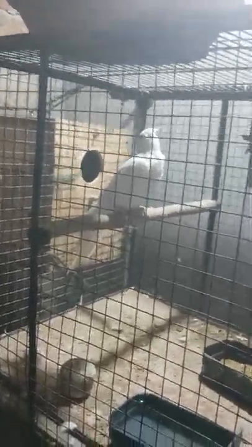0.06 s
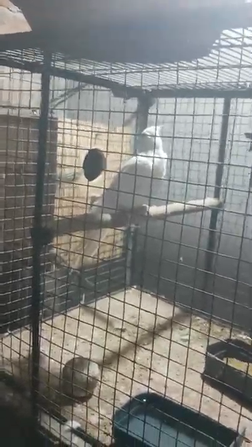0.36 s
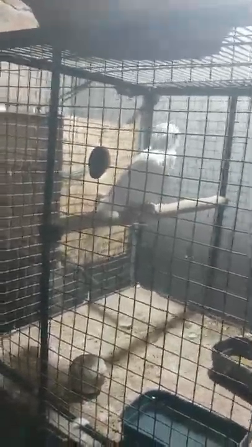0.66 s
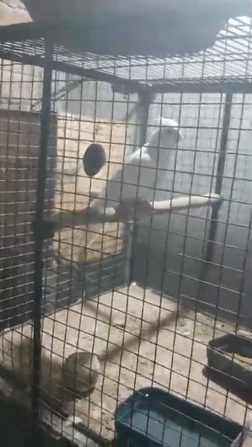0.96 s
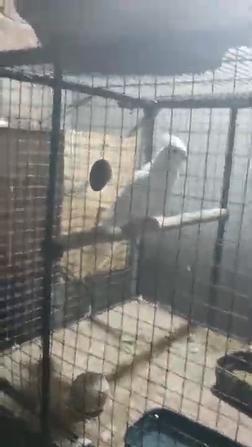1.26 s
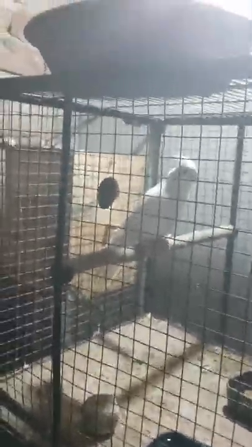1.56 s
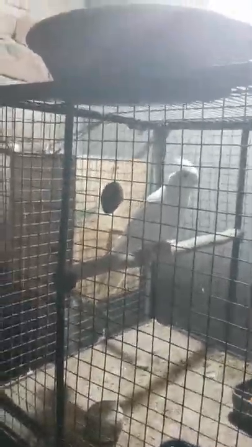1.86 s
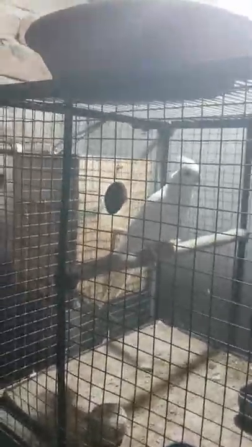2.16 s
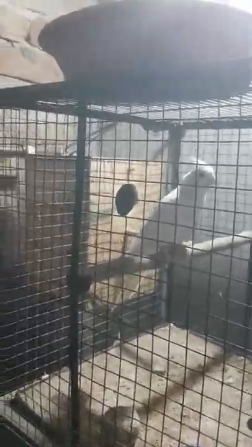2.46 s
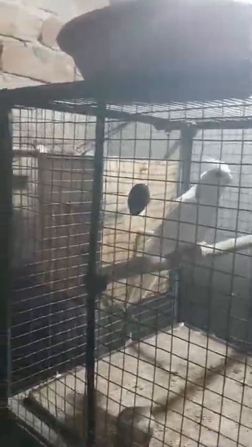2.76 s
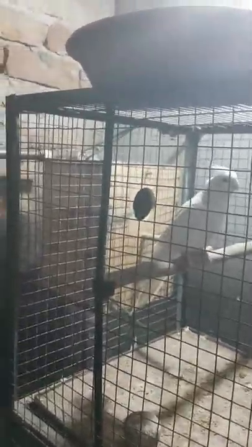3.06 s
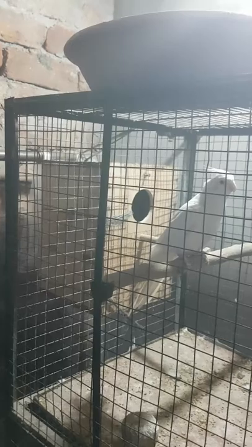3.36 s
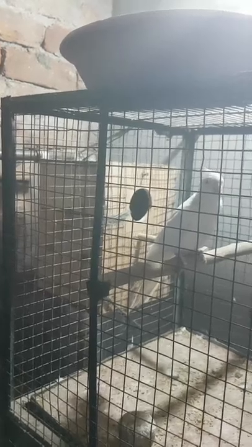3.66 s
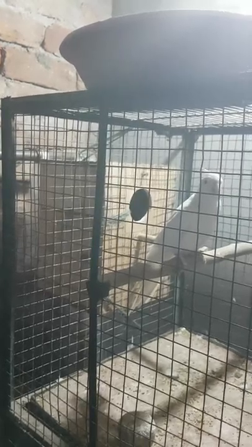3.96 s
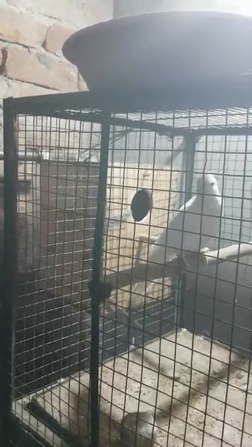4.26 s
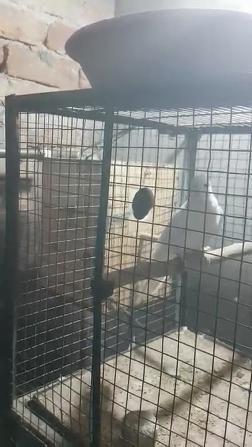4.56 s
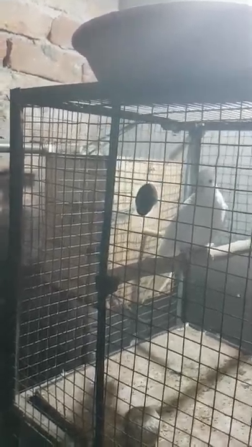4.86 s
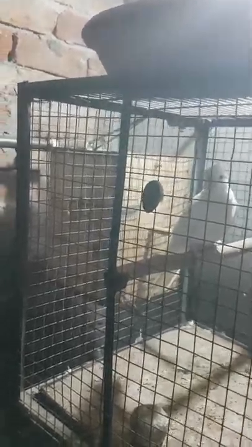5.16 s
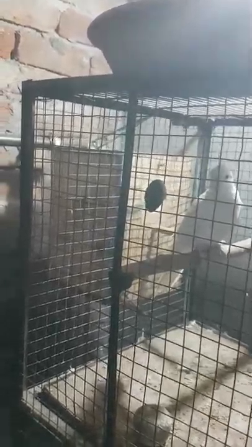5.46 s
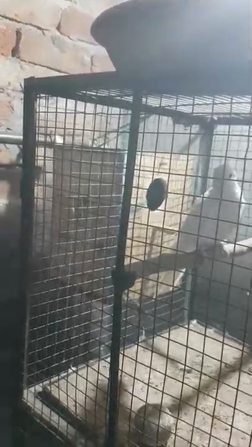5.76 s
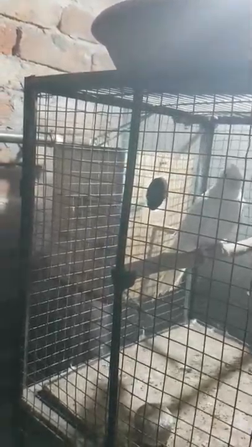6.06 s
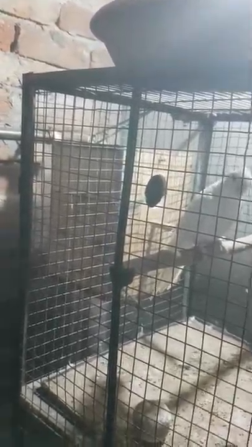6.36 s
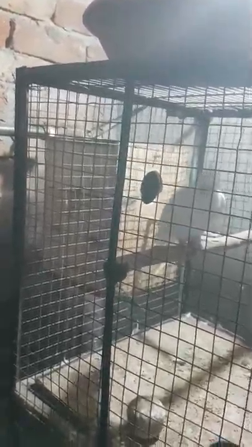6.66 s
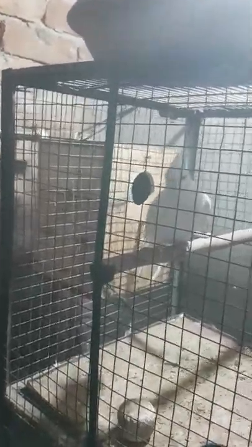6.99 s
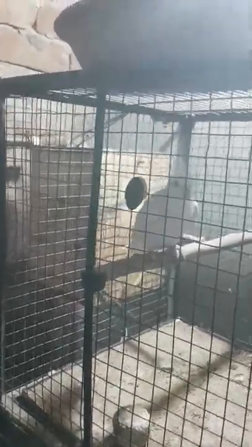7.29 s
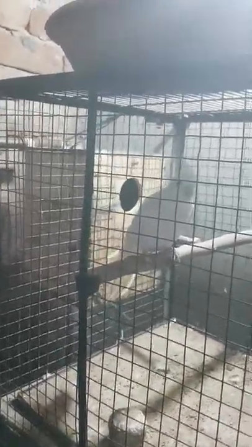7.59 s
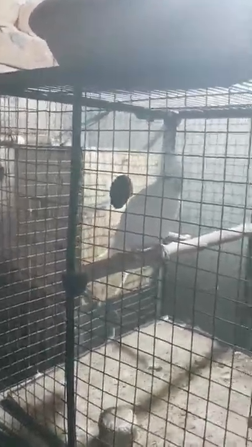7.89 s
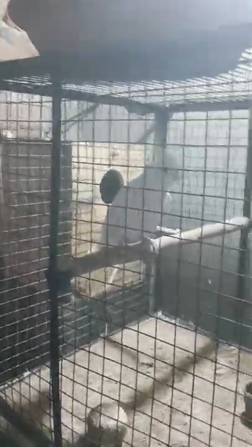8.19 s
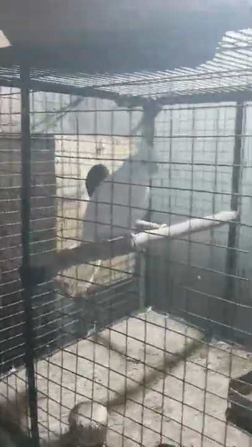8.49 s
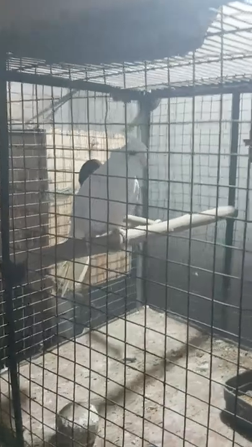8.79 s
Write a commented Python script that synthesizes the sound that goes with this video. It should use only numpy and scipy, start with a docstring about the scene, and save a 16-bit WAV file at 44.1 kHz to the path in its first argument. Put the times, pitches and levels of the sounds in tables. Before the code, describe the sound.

Over a faint room hum, a nearby cockatiel, a little to the right, gives a loud double-peaked whistle, then chatters quietly with short chirps and beak clicks. It whistles loudly again, rasps and screeches once. Faint notes and feather flicks lead to a sharp rising chirp, a quick run of warbles and a soft, dull bump. Close walls add a tight, short echo to the calls.

```python
"""A short rasp over faint hum and room noise: a cockatiel in a wire cage in a small brick room. Its syrinx
sings soft warbles, two loud two-humped whistles and one sharp chirp, and flaps chaotically for harsh rasps and
a screech. In between, the beak clicks and feathers brush. Close walls ring after every sound, and the loud
whistles flutter; near the end something bumps dully."""
import sys
import numpy as np
from scipy import signal
from scipy.fft import rfft, irfft
from scipy.io import wavfile
from scipy.ndimage import uniform_filter1d

SR = 44100
rng = np.random.default_rng(int(sys.argv[2]) if len(sys.argv) > 2 else 0)


def put_to_file(sound):
    """Save the sound as 16-bit audio at rate SR, in the file named by the first command-line argument."""
    columns = np.atleast_2d(sound).T  # one column per channel
    safe = np.clip(columns, -1, 1)
    whole_steps = np.round(safe * 32767)
    wavfile.write(sys.argv[1], SR, whole_steps.astype(np.int16))


N = 398223
FREQS = np.fft.rfftfreq(N, 1 / SR)
PROGRESS = np.linspace(0, 1, 41)  # breakpoints through one gesture


def gain_of(db):
    """Decibels to amplitude."""
    return 10 ** (np.asarray(db) / 20)


def unit_rms(x):
    """Scales to rms 1."""
    return x / np.sqrt(np.mean(x ** 2) + 1e-20)


def curve_at(points, hz):
    """Reads a curve on a log-frequency axis."""
    point_hz, value = np.transpose(points)
    return np.interp(np.log(hz + 1), np.log(point_hz + 1), value)


def add(mix, start_s, sound):
    """Mixes a sound in at its cue."""
    part = mix[max(round(start_s * SR), 0):][:len(sound)]
    part += sound[:len(part)]


def phase_of(hz):
    """Running phase of a moving pitch."""
    return 2 * np.pi * np.cumsum(hz) / SR


def low_cut(x, hz, order):
    """Rolls off the bass."""
    return signal.sosfilt(signal.butter(order, hz, "high", fs=SR, output="sos"), x)


def noise(eq, size):
    """White noise through an EQ curve, at rms 1."""
    gains = gain_of(curve_at(eq, np.fft.rfftfreq(size, 1 / SR)))
    return unit_rms(irfft(rfft(rng.standard_normal(size)) * gains, size))


def noise_band(centre_hz, width_hz, size):
    """Noise in a steep resonance that can glide: shift down to zero, smooth three times, shift back."""
    carrier = np.exp(1j * phase_of(np.full(size, centre_hz)))
    pole = np.exp(-np.pi * width_hz / SR)
    smoothed = signal.lfilter([1], np.poly([pole] * 3), rng.standard_normal(size) / carrier)
    return unit_rms((carrier * smoothed).real)


def wobble(top_hz, size):
    """Random motion of rms 1, slower than top_hz."""
    lowpass = signal.butter(2, top_hz, fs=SR, output="sos")
    return unit_rms(signal.sosfilt(lowpass, rng.standard_normal(size + SR // 10))[-size:])


def automation(times_s, *lanes):
    """Turns breakpoints into a soft-edged gate and one curve per lane."""
    t = np.arange(times_s[0], times_s[-1], 1 / SR)
    gate = np.clip(np.minimum(t - t[0], t[-1] - t) / 0.0017, 0, 1)
    return gate, *(np.interp(t, times_s, np.full(len(times_s), lane)) for lane in lanes)


def panned(pair, pan):
    """Tilts a stereo pair left or right, band by band, at constant power."""
    ratio = gain_of(curve_at(pan, FREQS))
    gains = np.array([ratio, np.ones_like(ratio)]) / np.sqrt((1 + ratio ** 2) / 2)
    return irfft(rfft(pair) * gains, N)


# EQ of the room's rumble and hiss: freq_hz, gain_db
RUMBLE_EQ = [(15, -58), (25, 2), (143, -2.5), (251, -4), (303, -2), (366, -5.5), (479, -8.5), (543, -9),
             (822, -11.5), (951, -11.5), (1200, -11.5), (1970, -11), (2430, -12), (3050, -20),
             (3600, -23.5), (4680, -58), (7920, -120)]
ROOM_HISS_EQ = [(2120, -59), (3600, -4), (4380, -4), (4720, 1.5), (4950, 0.5), (5230, -59), (5670, -11.5),
                (6570, -6.5), (7430, -8), (7700, -12), (8340, -23.5), (8930, -28), (13900, -21),
                (14900, -20.5), (15600, -28)]
# Partials of the hum: pitch_hz, level_db (before the trim)
HUM_PARTIALS = [(140.0, -57.5), (215.3, -63), (301.5, -63.5), (538.3, -65.5), (769.8, -72), (909.8, -65.5),
                (958.2, -63.5), (1104, -72)]
# How alike left and right are: freq_hz, coherence (0-1)
ROOM_COHERENCE = [(60, 1), (130, 0.89), (290, 0.88), (640, 0.37), (1410, 0.021), (3100, 0.02),
                  (6820, 0.017), (15000, 0.02)]
# Where the room tone leans: freq_hz, left_minus_right_db
ROOM_PAN = [(60, 0), (110, -2), (200, -2), (380, -1.5), (700, -4), (1290, -5.5), (2380, -10), (4400, -9),
            (8120, -5.5), (15000, 4)]
def room_tone(rumble_db=-48, hiss_db=-59, whine_db=-57, hum_trim_db=-1, waver_hz=1.47):
    """The bed: low rumble, thin hiss, a narrow whine near 5 kHz and a wavering hum."""
    left, spread = (gain_of(rumble_db) * noise(RUMBLE_EQ, N) + gain_of(hiss_db) * noise(ROOM_HISS_EQ, N)
                    + gain_of(whine_db) * noise_band(5050, 700, N) for _ in range(2))
    coherence = curve_at(ROOM_COHERENCE, FREQS)
    right = irfft(np.sqrt(coherence) * rfft(left) + np.sqrt(1 - coherence) * rfft(spread), N)
    hum = sum(gain_of(db + hum_trim_db) * unit_rms(np.sin(phase_of(hz + waver_hz * wobble(5.85, N))))
              for hz, db in HUM_PARTIALS)
    return panned(np.array([left, right]) + hum, ROOM_PAN)


# EQ of the hiss in a harsh call: freq_hz, gain_db
RASP_HISS_EQ = [(710, -78), (1200, -49), (1320, -1), (2230, -20), (2480, -17), (3140, 3), (3280, 3.5),
                (3650, -15.5), (4430, -3), (4980, -2), (6040, 3), (8880, -17), (9570, -23.5), (12900, -27),
                (15500, -26)]
# Rasp cues: start_s, rise_s, fall_s, level_db, onset_db (against the peak), from_hz, to_hz,
# second_hz, second_db, hiss_db (both levels against the gliding resonance)
RASP_CUES = [ (.002, 0.033, 0.029, -35, -3, 2650, 2550, 3250, -10, -9),
             (.592, 0.066, .037, -39, -6, 1950, 2150, 1100, -0.5, -21.5),
             (.935, .012, .03, -30, -7, 2900, 3120, 1760, -8, -5.5),
             (.969, 0.023, 0.027, -34, 3, 4400, 4300, 2000, -8, -12),
             (4.343, 0.021, 0.021, -25.5, 0, 2620, 2600, 1700, -3.5, -27.5),
             (4.617, 0.0098, .016, -38, -8, 2730, 2650, 4920, -6, -15),
             (4.757, .055, 0.029, -24, -25, 2280, 2500, 3580, -4, 3),
             (5.051, .026, .033, -21, -12, 2210, 2300, 4780, 0.5, 2),
             (5.108, .006, 0.029, -38, -2, 1980, 1500, 4000, -9, -20)]
def rasp(start_s, rise_s, fall_s, level_db, onset_db, from_hz, to_hz, second_hz, second_db, hiss_db):
    """The syrinx flaps chaotically: ragged bursts in a gliding and a steady resonance, over hiss."""
    t = (rise_s + fall_s) * PROGRESS
    swell_db = np.where(t < rise_s, onset_db * (1 - t / rise_s) ** 2, -15.5 * ((t - rise_s) / fall_s) ** 2)
    glide_hz = from_hz + (to_hz - from_hz) * PROGRESS
    gate, db, hz = automation(start_s + t, level_db + swell_db, glide_hz)
    size = len(gate)
    voice = noise_band(hz, 1100, size) + gain_of(second_db) * noise_band(second_hz, 1500, size)
    voice += gain_of(hiss_db) * noise(RASP_HISS_EQ, size)
    grain = np.exp(0.28 * wobble(500, size))
    return start_s, gate * gain_of(db) * unit_rms(low_cut(voice, 1400, order=3) * grain)


# Formants of throat and beak: freq_hz, gain_db
THROAT_EQ = [(700, -38), (1100, -19.5), (1600, -7.5), (2100, 2.5), (2700, 5), (3400, -2.5), (4200, -5.5),
             (5400, -20.5), (8000, -23.5), (9800, -26), (12500, -26.5), (16000, -25.5)]
# EQ of the whistle's breathy hiss: freq_hz, gain_db
BREATHY_EQ = [(1000, -22.5), (1800, 4.5), (3000, -8.5), (4300, 16.5), (5600, -11), (8000, 2.5),
              (9800, -43.5), (12500, -7), (15500, -13.5)]
def whistle(times_s, pitch_hz, level_db, roughness, overtones_db,
            jitter=0.1, flutter_hz=265, breath_db=-27, hoarse_db=-23):
    """The syrinx sings a tone that shakes with roughness; pushed hard, it flutters and turns hoarse."""
    gate, hz, db, rough = automation(times_s, pitch_hz, level_db, roughness)
    size = len(gate)
    effort = np.clip((db + 41) / 16, 0, 1)
    hz = uniform_filter1d(hz, size=200)
    phase = phase_of(hz * (1 + rough * jitter * wobble(550, size) + 0.0139 * wobble(108, size)))
    source_db = [0] + [overtone_db - 10 * (1 - effort) for overtone_db in overtones_db]  # soft is dull
    gains = [gain_of(partial_db + curve_at(THROAT_EQ, k * hz)) * (k * hz < SR / 2)
             for k, partial_db in enumerate(source_db, 1)]
    # the overtones are hoarser than the fundamental
    smear = wobble(350, size) * np.sqrt(rough + effort / 2)
    tone = sum(gain * np.exp(1j * (k * phase + (k - 1) * smear)) for k, gain in enumerate(gains, 1))
    tone /= np.sqrt(sum(gain ** 2 for gain in gains) / 2)
    # a slow second vibration of the membranes hangs a ladder of sidebands under every partial
    flutter = np.exp(-1j * phase_of(flutter_hz * (1 + 0.194 * wobble(56.7, size))))
    depth = 0.42 * np.clip((db + 34) / 10, 0, 1)
    tone = (tone * (1 + depth * flutter + (depth * flutter) ** 2)).real / np.sqrt(1 + depth ** 2)
    falter = gain_of(2.5 * (1 - effort) * wobble(45, size))
    shimmer = 1 + 0.31 * rough * wobble(550, size)
    hoarse = gain_of(hoarse_db) * effort * 2 * rough * noise_band(2 * hz, 1200, size)
    breath = gain_of(breath_db) * (0.5 + 2 * rough) * noise(BREATHY_EQ, size)
    return times_s[0], gate * gain_of(db) * (tone * falter * shimmer + hoarse + breath)


# Soft notes: start_s, length_s, first_hz, middle_hz, last_hz, level_db, roughness (0-1)
WARBLE_CUES = [ (0.267, .012, 2600, 2780, 3050, -38.5, 0.1), (.283, .02, 3200, 3620, 3950, -50, .5),
               (.314, 0.069, 2150, 2255, 2310, -48, 0.6), (0.334, 0.024, 2820, 3330, 2950, -47, 0.2),
               (0.356, 0.042, 2920, 3150, 3560, -42, 0.54), (0.995, 0.023, 1910, 2064, 2560, -35, 0.3),
               (1.053, 0.03, 1450, 1286, 1450, -45.5, 0.54), (1.362, 0.039, 3270, 3390, 3040, -43.5, 0.43),
               (1.409, 0.058, 2770, 2436, 2830, -43, 0.63), (1.481, 0.027, 1800, 2310, 2800, -37.5, 0.65),
               (1.52, 0.029, 1750, 1880, 2140, -42, 0.65), (1.555, 0.056, 2340, 2345, 2190, -32.5, 0.22),
               (1.62, 0.018, 2140, 2010, 1900, -37, 0.34), (1.747, 0.12, 1445, 1528, 1533, -44, 0.03),
               (1.85, 0.065, 1616, 1705, 1420, -46, 0.2), (2.056, 0.092, 1326, 1400, 1390, -44, 0),
               (2.274, 0.027, 1850, 2040, 2190, -42, 0.65), (2.303, 0.03, 1890, 1650, 1540, -41.5, 1),
               (2.52, 0.026, 2700, 3106, 3180, -38, 0.2), (2.55, 0.02, 2170, 2010, 1950, -36.5, 0.77),
               (2.586, 0.056, 2820, 2390, 2370, -38.5, 0.42), (2.651, 0.037, 2240, 2010, 1860, -38, 0.42),
               (2.979, 0.081, 802, 727, 827, -44.5, 0.1), (3.103, .025, 2130, 2020, 1980, -47, 0.5),
               (3.271, 0.022, 2250, 2330, 2450, -33.5, 0.65), (3.307, .045, 1470, 1656, 2080, -43, 0.75),
               (3.375, .06, 4300, 3960, 3800, -55, 0.66), (3.844, 0.0093, 2300, 2360, 2500, -40, .15),
               (3.861, 0.016, 2600, 2760, 2750, -45, 0.1), (3.883, 0.012, 1900, 2020, 2160, -39, .3),
               (3.91, 0.062, 2520, 2680, 2560, -39.5, 0.24), (3.975, 0.023, 2140, 2030, 2010, -34.5, 0),
               (4.045, .035, 2250, 2292, 2200, -46, .2), (4.082, 0.056, 2670, 2820, 2760, -49, 0.7),
               (4.437, 0.041, 2580, 2480, 2320, -41, 0), (4.493, 0.057, 1377, 1215, 1100, -45, .45),
               (4.554, 0.09, 1092, 1009, 1083, -40, 0.12), (4.659, 0.14, 1338, 1085, 994, -42.5, 0.4),
               (4.847, 0.043, 1674, 1544, 1400, -40, 0), (4.894, .07, 1065, 1412, 1460, -43.5, 0.25),
               (5.15, 0.036, 2980, 2690, 2470, -47.5, .2), (5.181, .028, 2380, 2247, 2330, -35, 0.35),
               (5.408, 0.052, 2120, 2200, 2230, -38, 0.54), (5.564, 0.033, 1675, 1815, 2030, -37.5, 1),
               (5.61, 0.025, 2200, 1960, 1860, -31, 0.3), (5.738, 0.073, 3750, 4100, 4300, -61, 0.4),
               (6.646, 0.065, 2190, 2390, 2460, -49.5, 0.42), (6.86, 0.095, 2200, 2090, 1840, -54, 0.25),
               (6.945, .095, 2283, 2283, 2125, -43.5, 0.02), (7.042, 0.058, 2196, 2040, 1970, -49.5, 0.04),
               (7.231, 0.084, 4400, 4400, 3880, -52.5, 0.96), (7.927, 0.017, 2370, 2520, 2900, -46, 0.8),
               (7.945, 0.012, 2970, 3060, 2920, -34.5, 0.4), (7.957, 0.017, 1720, 1470, 1340, -36, 0.37),
               (7.972, 0.095, 1384, 1613, 1780, -43, .1), (7.983, 0.0087, 2050, 2150, 2600, -38, .5),
               (7.996, 0.013, 2830, 2980, 2800, -28.5, 0.3), (8.017, .026, 2500, 2300, 2400, -33, 0.1),
               (8.043, 0.029, 2470, 2544, 2540, -30, .12), (8.071, .036, 2277, 2015, 2010, -29, 0.25),
               (8.105, 0.014, 1920, 1550, 1250, -38.5, 0.2), (8.133, 0.038, 2095, 2277, 2220, -34, 0),
               (8.176, 0.042, 2066, 1900, 1460, -36.5, 0.1), (8.9, 0.1, 2230, 2630, 2360, -47, 0.64)]
def warble(start_s, length_s, first_hz, middle_hz, last_hz, level_db, roughness):
    """One smooth bend of the syrinx: it starts firmly, peaks a little early and fades."""
    bend = np.polyfit([0, 0.5, 1], [first_hz, middle_hz, last_hz], 2)
    off_peak = 2 * PROGRESS ** 0.97 - 1
    swell_db = np.where(off_peak < 0, -4, -7) * off_peak ** 2
    return whistle(start_s + length_s * PROGRESS, np.polyval(bend, PROGRESS), level_db + swell_db,
                   roughness, overtones_db=[-9.5, -21, -34, -40, -23, -29])


# Syrinx overtones in the lead-in, from the second harmonic up: level_db
LEAD_IN_OVERTONES_DB = [2, 3, -22, -31]
def lead_in(start_s, length_s):
    """A low, reedy note that rises and swells into a loud call."""
    return whistle([start_s, start_s + length_s], pitch_hz=[1634, 1963], level_db=[-36, -26.5],
                   roughness=0.36, overtones_db=LEAD_IN_OVERTONES_DB, flutter_hz=196.6, breath_db=-22)


def hump(times_s, arch, top_hz, top_db, trough_hz=1690, trough_db=-27):
    """One push of air makes the tone higher, louder and cleaner; a full arch runs from 0 to 1."""
    push = np.abs(np.sin(np.pi * arch ** 0.9)) ** 1.1
    pitch_hz = trough_hz + (top_hz - trough_hz) * push
    level_db = trough_db + (top_db - trough_db) * push ** 1.44
    roughness = np.interp(push, [0, 1], [0.25, 0.063])
    return np.array([times_s, pitch_hz, level_db, roughness])


def beak_hiss(times_s, call_db, level_db=-60, follow=0.2):
    """Air whistles thinly over the edge of the beak, loosely following the call's level."""
    gate, db = automation(times_s, call_db)
    envelope = gate * gain_of(level_db + follow * (db - db.max()))
    return times_s[0], envelope * noise_band(12400, 3600, len(gate))


# Syrinx overtones in the humps, from the second harmonic up: level_db
HUMP_OVERTONES_DB = [-7.5, -28.5, -38, -31, -17.5, -22]
# Loud calls: start_s, lead_s, then for the two humps their lengths first_s, second_s
# and their tops first_hz, second_hz, first_db, second_db
CALL_CUES = [(.684, .04, .101, .056, 2710, 2560, -14, -16.5),
             (4.198, .052, .121, .054, 2738, 2540, -12.5, -18)]
def loud_call(start_s, lead_s, first_s, second_s, first_hz, second_hz, first_db, second_db):
    """Yields three layers: the lead-in, two humps whistled without a break, and their beak hiss."""
    yield lead_in(start_s, lead_s)
    humps_s = start_s + lead_s
    # the call enters and leaves part-way along an arch
    first = hump(humps_s + first_s * PROGRESS, 0.12 + 0.88 * PROGRESS, first_hz, first_db)
    second = hump(humps_s + first_s + second_s * PROGRESS, 0.73 * PROGRESS, second_hz, second_db)
    times_s, pitch_hz, level_db, roughness = np.hstack([first, second[:, 1:]])
    yield whistle(times_s, pitch_hz, level_db, roughness, HUMP_OVERTONES_DB,
                  jitter=0.033, flutter_hz=271.2, hoarse_db=-28)
    yield beak_hiss(times_s, level_db)


# EQ of the snap: freq_hz, gain_db
SNAP_EQ = [(290, -59), (500, -7), (1490, -1.5), (1700, -17), (2020, 5), (2930, -2.5), (3390, -4.5),
           (4030, -11.5), (5060, -14), (5850, -29), (7530, -16.5), (8840, -38), (12000, -36), (15600, -69),
           (22000, -120)]
# Modes of the hollow of the beak: pitch_hz, width_hz, level_db
BEAK_MODES = [(642, 39, -3.5), (1012, 15, 0), (1353, 21, 1), (1608, 44, 2), (1960, 44, 6), (2510, 32, 2),
              (3360, 120, -20.5)]
# Click cues: start_s, level_db (before the trim), treble_db (drives a shelf, flat at -21)
CLICK_CUES = [(1.1878, -30, -14), (1.269, -42, -17), (2.2066, -34, -21), (2.2276, -33.5, -34),
              (2.42, -33.5, -21), (3.3293, -35.5, -18), (3.4483, -30, -19), (4.457, -29, -21),
              (5.272, -36.5, -38), (5.4027, -27, -37), (5.9688, -29.5, -23), (6.0388, -38, -17),
              (6.1516, -26.5, -15), (6.332, -29.5, -16)]
def beak_click(start_s, level_db, treble_db, trim_db=-5, snap_decay_s=0.015, ring_decay_s=0.012):
    """The beak snaps, and its hollow rings briefly, a little differently each time."""
    t = np.arange(SR // 8) / SR
    shelf_db = 0.45 * (treble_db + 21)
    eq = [(hz, db + shelf_db * (hz > 3500)) for hz, db in SNAP_EQ]
    snap = noise(eq, len(t)) * np.exp(-t / snap_decay_s)
    modes = sum(gain_of(db) * np.sin(phase_of(hz + width_hz / 2 * wobble(62, len(t))))
                for hz, width_hz, db in BEAK_MODES)
    ring = gain_of(-1) * unit_rms(modes) * np.exp(-t / ring_decay_s)
    attack = 1 - np.exp(-t / 0.0004)
    return start_s, gain_of(level_db + trim_db) * (snap + ring) * attack


# EQ of brushing feathers: freq_hz, gain_db
FEATHER_EQ = [(2000, -6), (5000, 1.5), (9000, -16), (13000, -6), (16000, -7.5)]
# Feather cues: start_s, level_db, decay_s
FEATHER_CUES = [(2.82, -39, 0.0079), (6.41, -41, 0.021), (7.556, -46, 0.011)]
def feather_brush(start_s, level_db, decay_s, attack_s=0.0012):
    """Feathers flick with a thin, quickly dying hiss."""
    t = np.arange(SR // 5) / SR
    envelope = np.exp(-t / decay_s) * (1 - np.exp(-t / attack_s))
    return start_s, gain_of(level_db) * envelope * noise(FEATHER_EQ, len(t))


def screech(start_s=5.451, rise_s=0.027, hold_s=0.11, fall_s=0.037, level_db=-15.5, jitter=0.075):
    """A tone torn by pitch jitter drops and holds, while a strong resonance slides up above it."""
    corners_s = np.cumsum([0, rise_s, hold_s, fall_s])
    t = corners_s[-1] * PROGRESS
    swell_db = np.interp(t, corners_s, [-20, 0, -0.8, -24])
    drop_hz = 2630 + (4250 - 2630) / (1 + (t / 0.021) ** 6)
    slide_hz = 5770 + (4750 - 5770) / (1 + (t / 0.058) ** 16)
    gate, db, pitch_hz, upper_hz = automation(start_s + t, level_db + swell_db, drop_hz, slide_hz)
    size = len(gate)
    tone = unit_rms(np.sin(phase_of(pitch_hz * (1 + jitter * wobble(700, size)))))
    upper = gain_of(3) * noise_band(upper_hz, 1150, size)
    beak_ring = gain_of(-11) * noise_band(12500, 2600, size)
    # a shoulder of noise sits above the tone, and another above the resonance
    shoulders = noise_band(pitch_hz + 750, 1150, size) + noise_band(7400, 2900, size) / 2
    hiss = gain_of(-3) * noise(RASP_HISS_EQ, size)
    voice = low_cut(tone + upper + beak_ring + shoulders + hiss, 2200, order=8)
    return start_s, gate * gain_of(db) * unit_rms(voice)


# Breakpoints of the chirp and its echo: time_s, pitch_hz, level_db, roughness (0-1)
CHIRP_AND_ECHO = [(7.458, 2970, -26, .15), (7.466, 3260, -36, 0.2), (7.472, 3656, -23.5, .12),
                  (7.488, 4060, -14.5, .1), (7.494, 3920, -27.5, .15), (7.505, 3580, -23, .25)]
def chirp():
    """A sharp, breathy chirp flicks upward, followed at once by a fainter, lower echo."""
    return whistle(*np.transpose(CHIRP_AND_ECHO), overtones_db=[4.2, -2, -13], jitter=0.055, breath_db=-18)


# EQ of the dull bump: freq_hz, gain_db
BUMP_EQ = [(90, -25), (180, -3), (300, 7), (430, -4), (800, -11), (1300, -14), (2500, -29), (14000, -47)]
def bump(start_s=8.44, rise_s=0.028, hold_s=0.095, fade_s=0.49, level_db=-42.5, edge_db=-20):
    """A soft, low shuffle that rumbles away."""
    t = np.arange(0, rise_s + hold_s + fade_s, 1 / SR)
    rise_db = edge_db * np.maximum(1 - t / rise_s, 0)
    fade_db = edge_db * np.maximum((t - rise_s - hold_s) / fade_s, 0) ** 0.64
    track = np.zeros(N)
    add(track, start_s, gain_of(level_db + rise_db + fade_db) * noise(BUMP_EQ, len(t)))
    return track


# Early reflections, a left list and a right list: delay_ms, gain
WALL_ECHOES = [
    [(2.3, -0.64), (5.9, 0.028), (9.1, 0.82), (15.3, -0.00055)],
    [(1.3, -0.042), (6.7, 0.12), (10.7, 0.15), (18.2, 0.33)],
]
def brick_walls(dry, ring_db=-4.5, ring_t60_s=0.15, tail_db=-21, tail_t60_s=0.23, trim_db=-2):
    """Close walls follow the direct sound with early reflections, a short dense ring and a faint tail."""
    t = np.arange(SR // 2) / SR
    response = np.zeros((2, len(t)))
    # the direct sound reaches the left first but shaded, so that side hears more of the walls
    response[0, 0], response[1, 2] = 0.7, 1
    for channel, echoes in zip(response, WALL_ECHOES):
        for delay_ms, gain in echoes:
            channel[round(delay_ms * SR / 1000)] += gain
        for db, t60_s in ((ring_db, ring_t60_s), (tail_db, tail_t60_s)):
            taps = rng.choice([-1, 1], len(t)) * (rng.random(len(t)) < 3000 / SR)  # about 3000 a second
            taps = taps * (t > 0.003) * gain_of(-60 * t / t60_s)
            channel += gain_of(db) * taps / np.linalg.norm(taps)
    return gain_of(trim_db) * signal.fftconvolve(dry[None], response, axes=1)[:, :N]


# Where the bird sits: freq_hz, left_minus_right_db
BIRD_PAN = [(700, -6), (1300, -11.5), (2500, -10.5), (4400, -6), (8000, -8), (12500, 5)]
def scene():
    """The bird, to the right, between close walls, over the room tone and the bump."""
    bird = np.zeros(N)
    for cue in CALL_CUES:
        for layer in loud_call(*cue):
            add(bird, *layer)
    for cue in WARBLE_CUES:
        add(bird, *warble(*cue))
    add(bird, *chirp())
    for cue in RASP_CUES:
        add(bird, *rasp(*cue))
    add(bird, *screech())
    for cue in CLICK_CUES:
        add(bird, *beak_click(*cue))
    for cue in FEATHER_CUES:
        add(bird, *feather_brush(*cue))
    return panned(brick_walls(bird), BIRD_PAN) + room_tone() + bump()


def record(dry):
    """The microphone's bass roll-off and a steep high cut."""
    high_cut = signal.firwin(511, 15750, window=("kaiser", 9), fs=SR)
    return signal.oaconvolve(low_cut(dry, 46, order=4), high_cut[None], "same", axes=1)


dry = scene()
out = record(dry)
put_to_file(out)
```